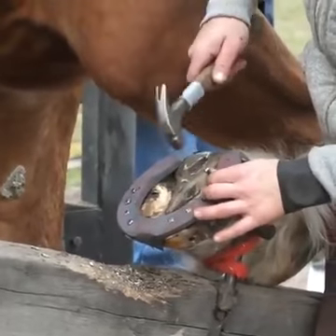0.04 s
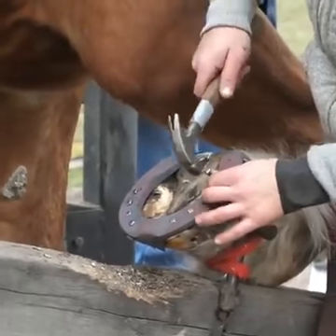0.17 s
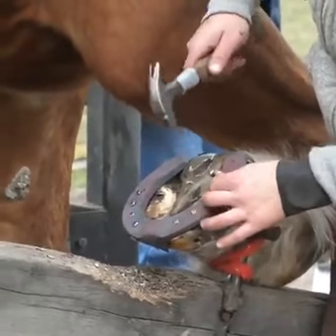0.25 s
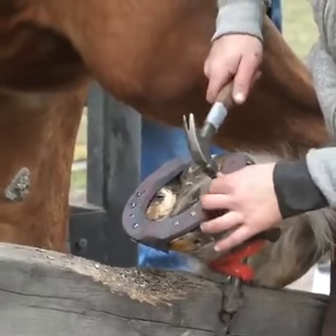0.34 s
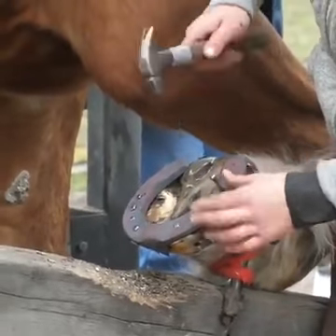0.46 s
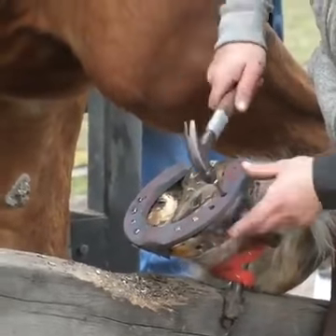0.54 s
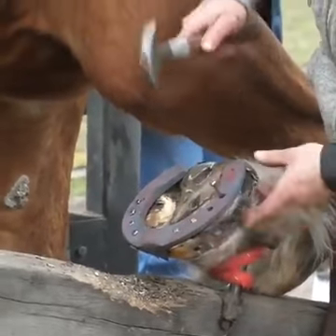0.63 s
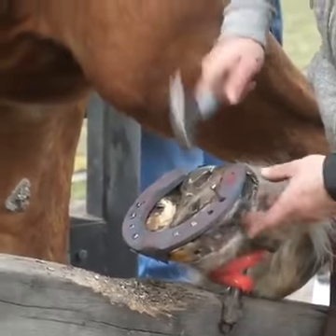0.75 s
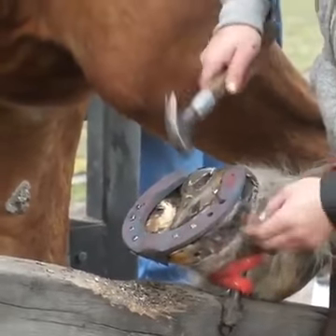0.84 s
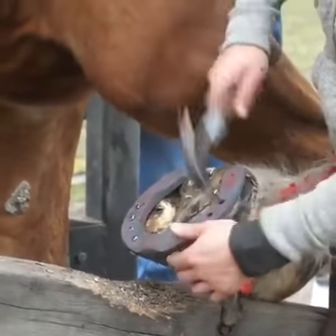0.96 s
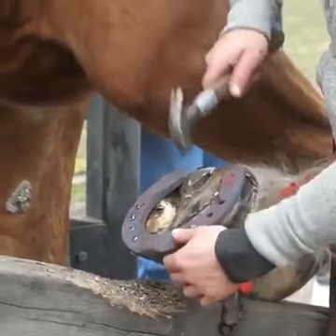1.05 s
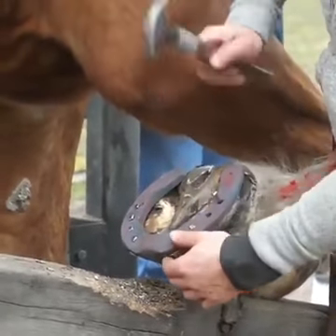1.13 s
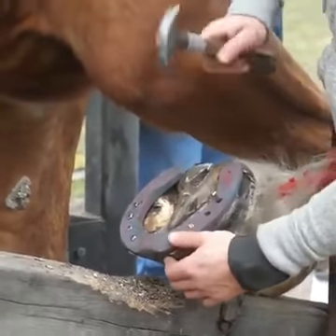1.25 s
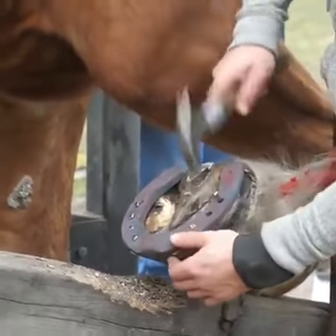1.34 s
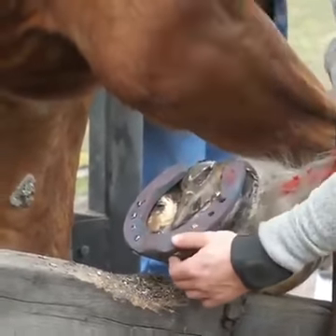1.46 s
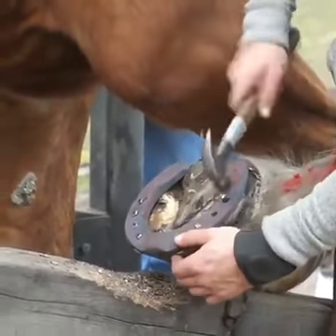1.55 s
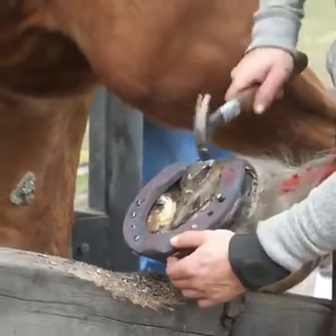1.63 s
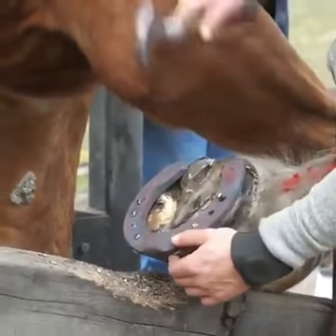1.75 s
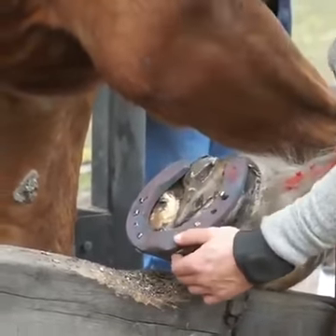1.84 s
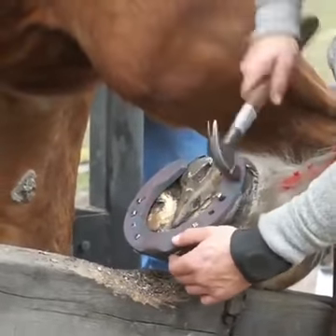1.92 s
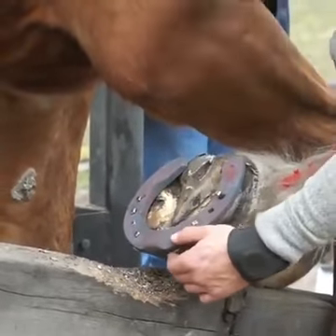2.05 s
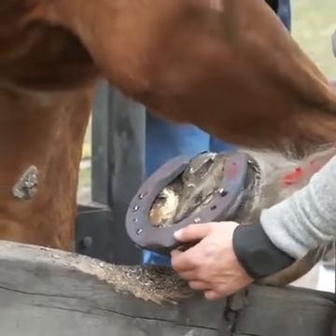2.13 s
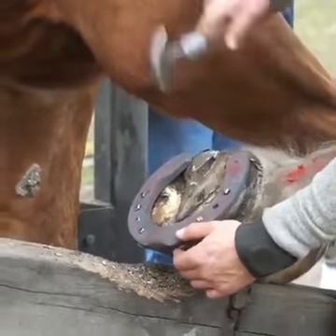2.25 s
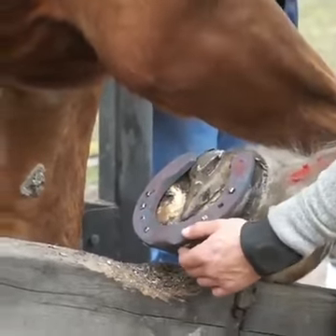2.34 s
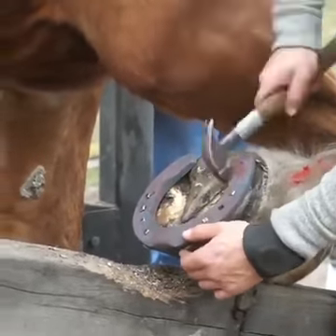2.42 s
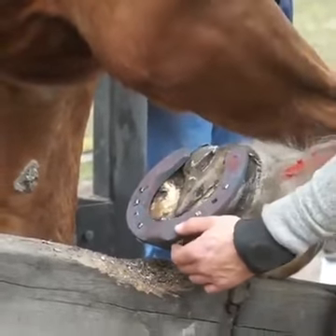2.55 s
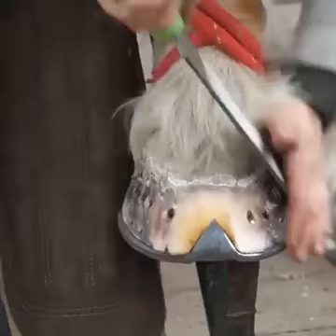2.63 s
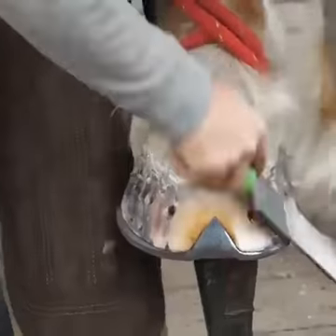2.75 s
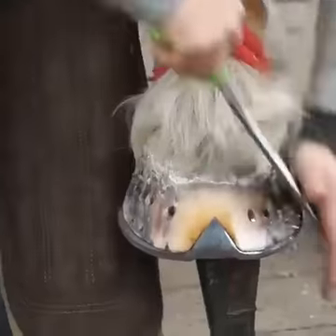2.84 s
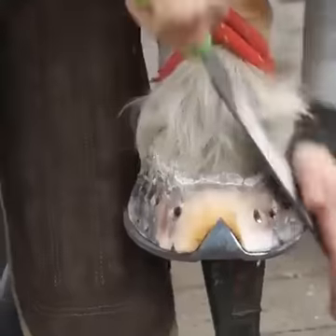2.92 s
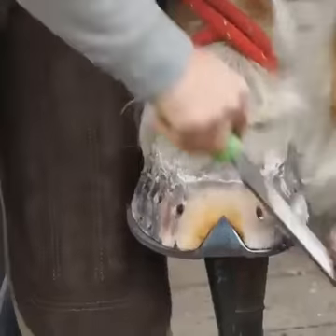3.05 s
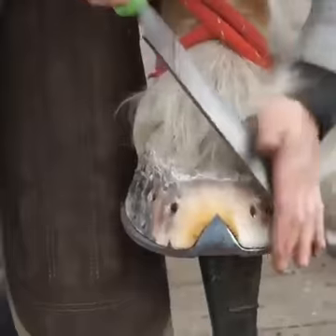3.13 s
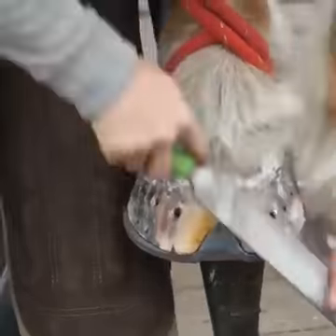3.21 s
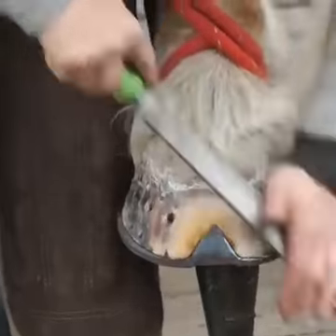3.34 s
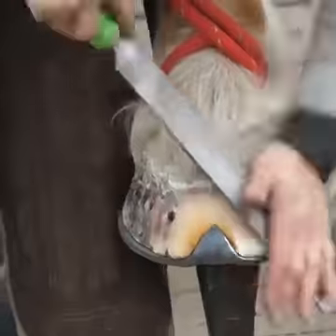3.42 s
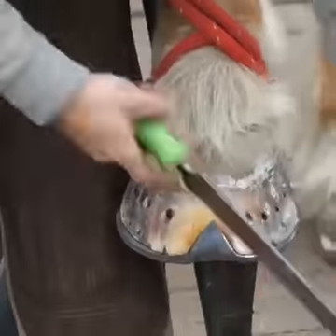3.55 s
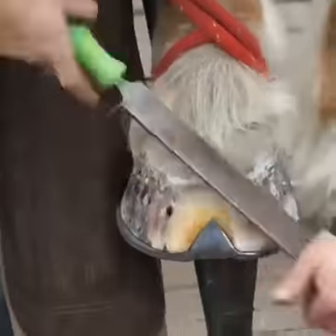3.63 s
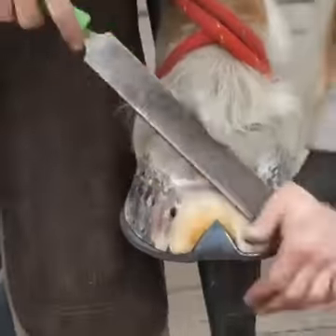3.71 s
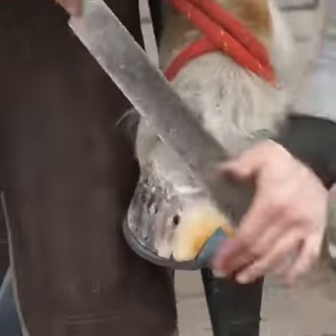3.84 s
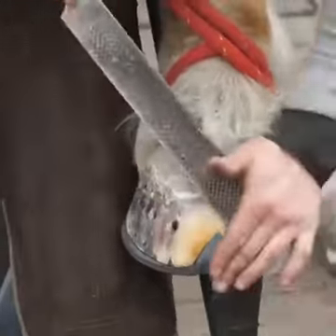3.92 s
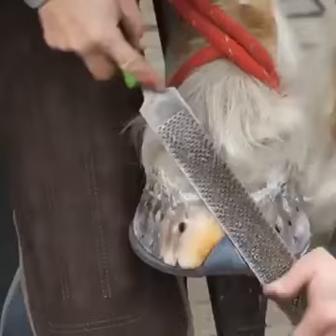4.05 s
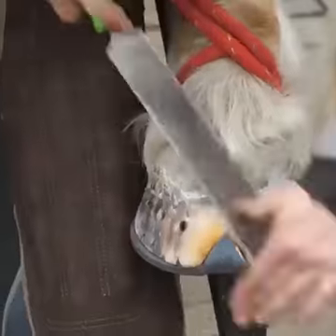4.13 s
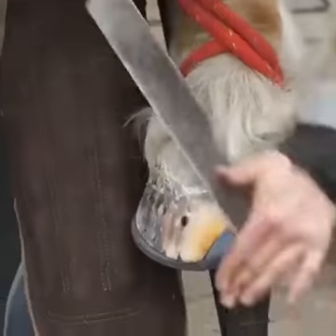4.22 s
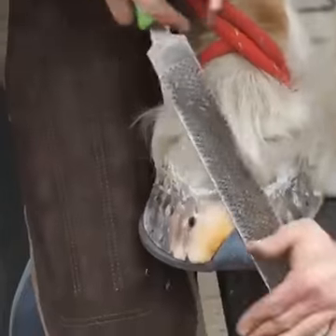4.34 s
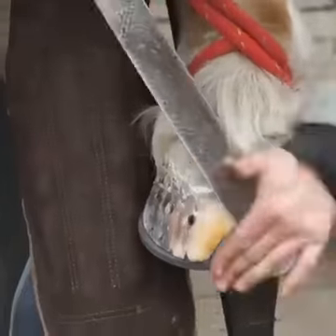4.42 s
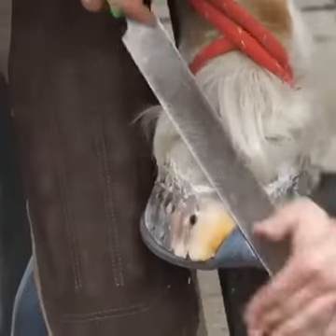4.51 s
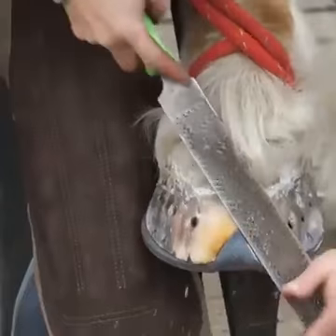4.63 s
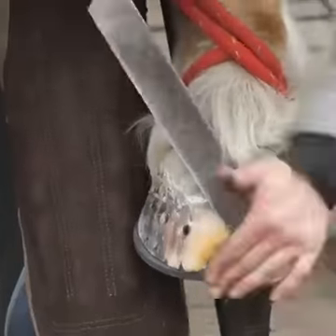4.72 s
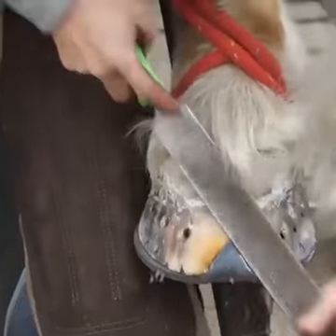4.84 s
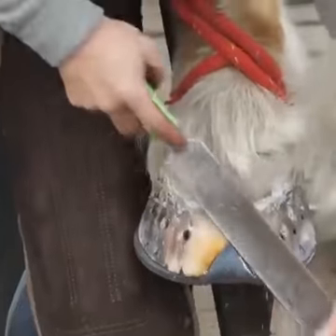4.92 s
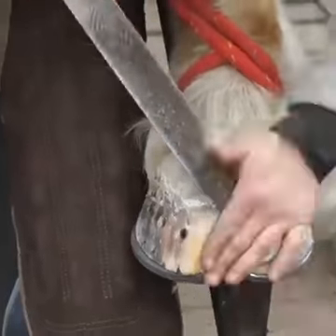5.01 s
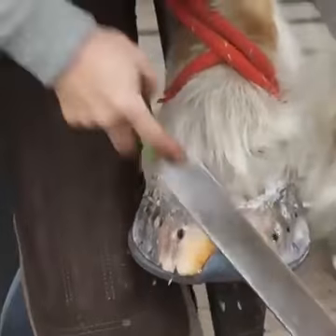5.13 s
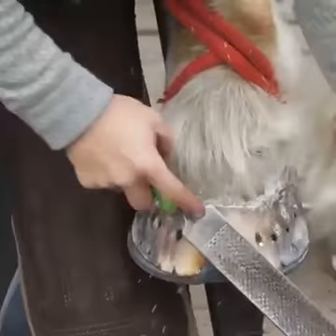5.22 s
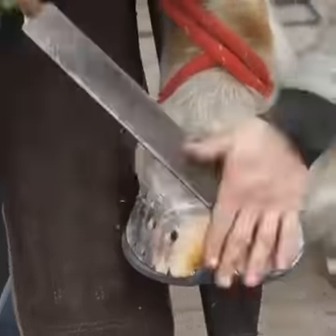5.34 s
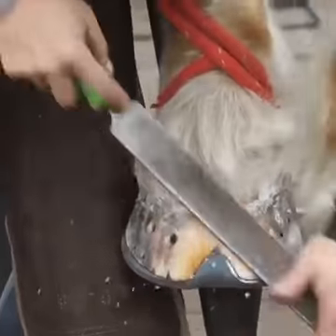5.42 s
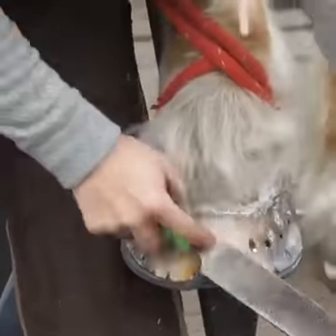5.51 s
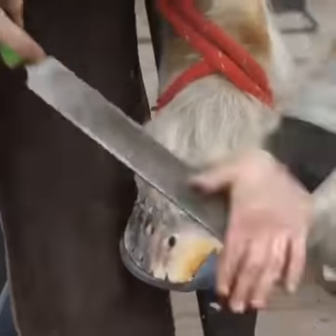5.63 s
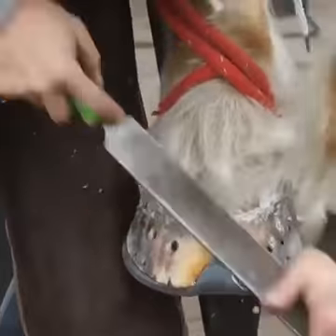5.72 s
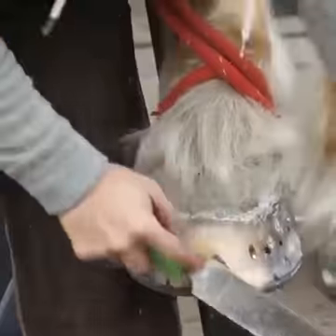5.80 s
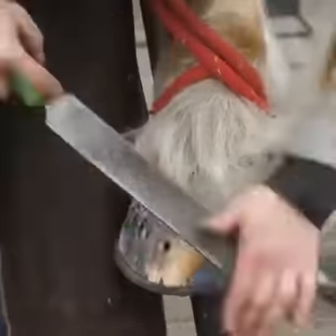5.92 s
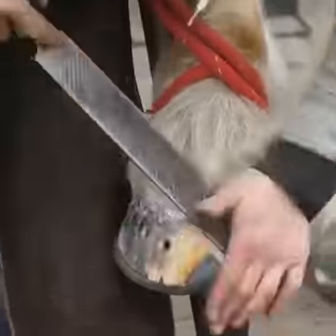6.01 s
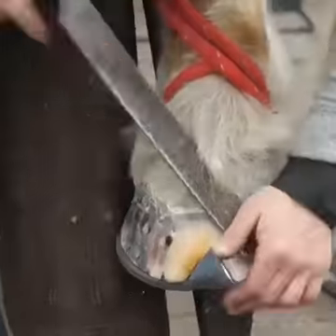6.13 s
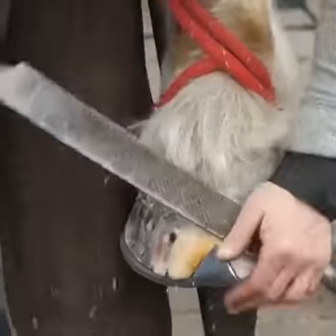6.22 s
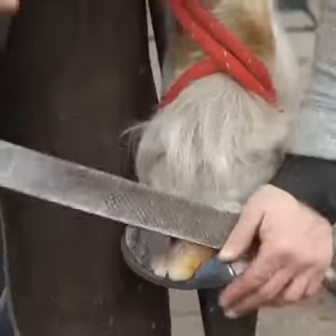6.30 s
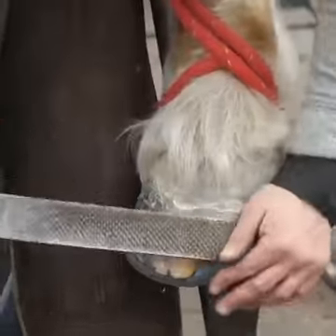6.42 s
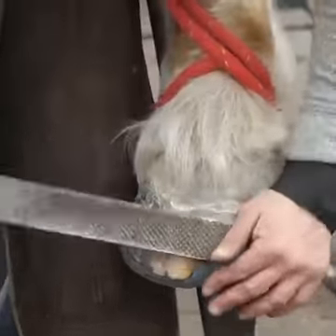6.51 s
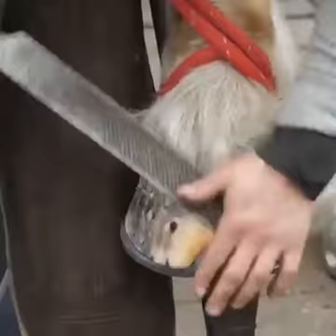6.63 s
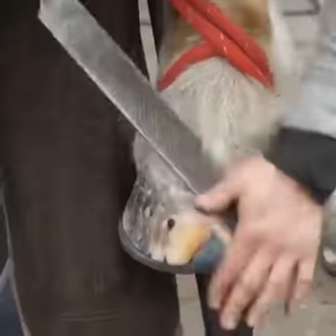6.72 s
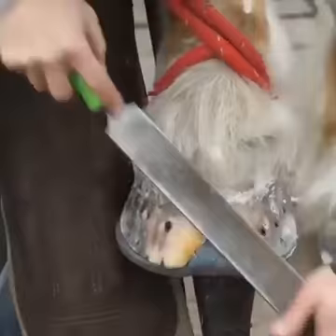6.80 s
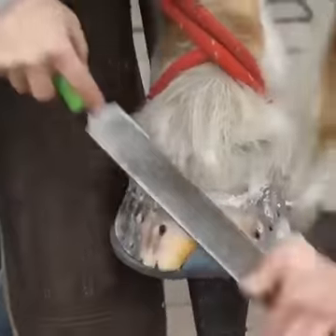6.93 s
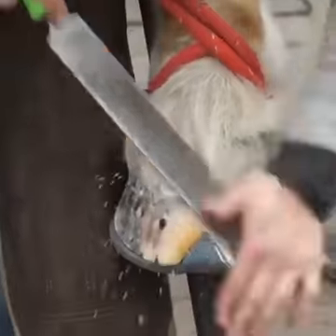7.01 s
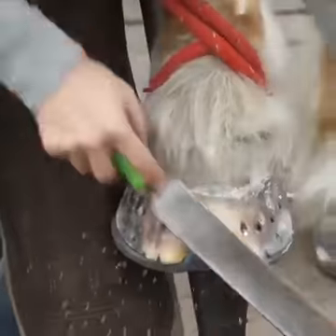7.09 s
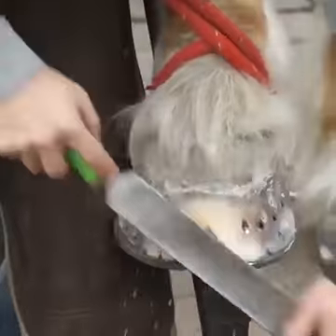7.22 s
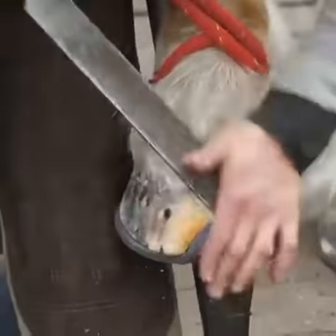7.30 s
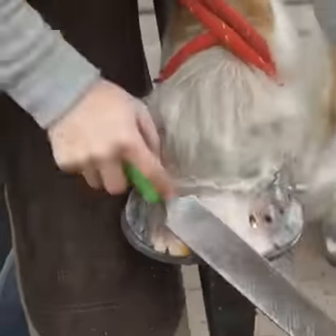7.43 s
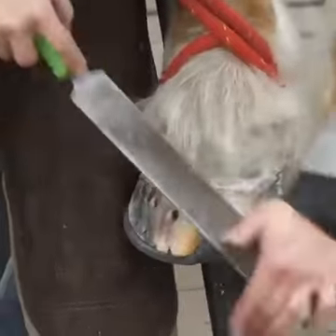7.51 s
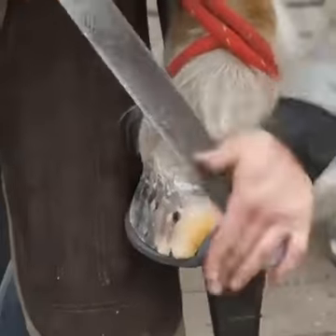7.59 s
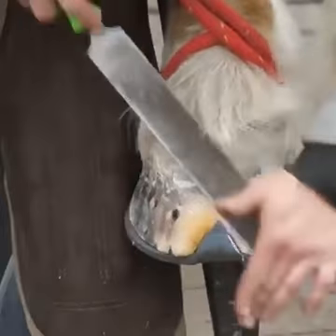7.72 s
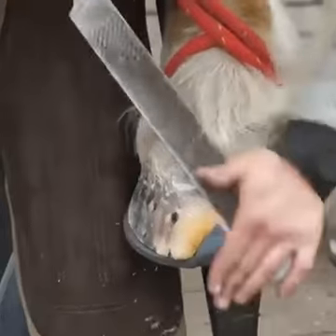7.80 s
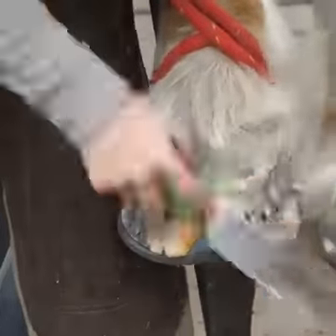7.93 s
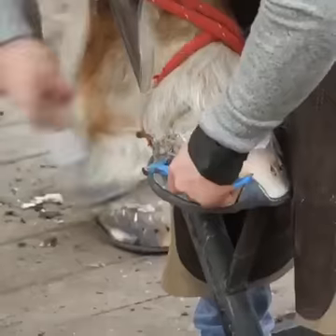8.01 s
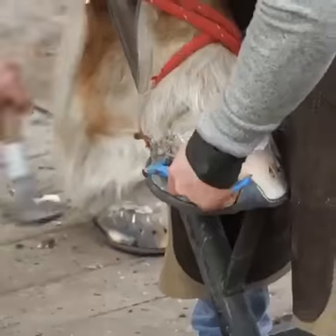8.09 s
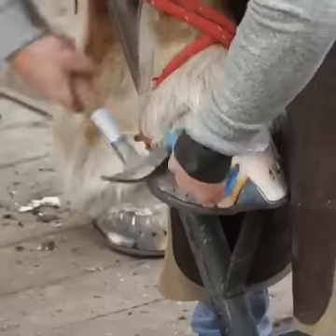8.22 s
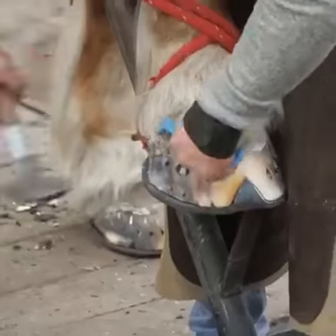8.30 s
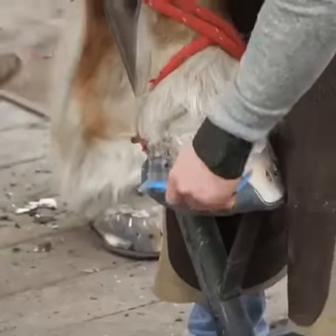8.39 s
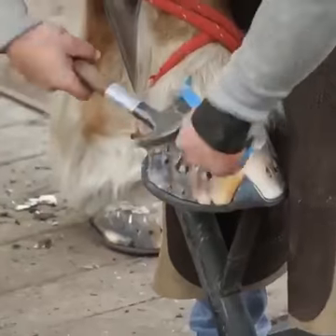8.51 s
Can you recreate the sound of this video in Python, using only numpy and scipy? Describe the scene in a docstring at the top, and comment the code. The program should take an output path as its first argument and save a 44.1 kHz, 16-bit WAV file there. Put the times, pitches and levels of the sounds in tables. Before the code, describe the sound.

In an open yard, a bird chirps faintly over a soft hiss and low hum while a hammer starts tapping horseshoe nails close to the microphone. The blows get louder and ring brightly. Then a rasp files the hoof wall in short, gritty strokes as the hoof stand knocks dully. The filing eases, picks up again with two quick falling zips, and the hammer returns with two sharp hits.

```python
"""A farrier works on a shod hoof in an open yard, over a low hum, a soft hiss and a little wind.
A bird chirps faintly as a light hammer starts tapping the nails: each blow cracks and thuds,
the steel head sings, and the shoe rings on after two hard hits. From about 3 s a rasp files the
hoof wall in quick strokes, its teeth tearing chips while the hoof stand rocks and knocks.
Late on the teeth zip twice and the shoe rings again; just after 8 s the hammer returns."""
import sys
import numpy as np
from scipy import signal
from scipy.fft import rfft, irfft, next_fast_len
from scipy.io import wavfile
from scipy.ndimage import uniform_filter1d

SR = 44100
rng = np.random.default_rng(int(sys.argv[2]) if len(sys.argv) > 2 else 0)


def dump_mix(stems):
    """Bounce the given channels to the path in sys.argv[1] as a 16-bit WAV at rate SR."""
    frames = np.atleast_2d(stems).T  # one column per channel
    limited = np.clip(frames, -1, 1)  # hard clip at full scale
    pcm = np.round(limited * 32767).astype(np.int16)
    wavfile.write(sys.argv[1], SR, pcm)


N = 377231

# hammer blows, with lighter scuffs and scrapes among them: t/s, crack/dB, thud/dB, brightest f/Hz, hardness/(dB
# per octave), rattle/dB, song of the head/dB, fade of the song/(dB per s)
BLOWS = [(0.034, -25.5, -53, 3480, 18, -44, -80, 200), (0.2269, -25, -45, 7850, 5, -44, -46, 230),
         (0.3678, -27.5, -61, 5060, 1.5, -45, -80, 200), (0.423, -24, -33, 9680, 2, -39.5, -45, 160),
         (0.59, -38, -53, 4000, -5, -55, -80, 200), (0.624, -23, -29.5, 4800, 5, -33, -40, 174),
         (0.845, -15, -29, 8800, -2, -36.5, -40.5, 139), (0.9086, -27, -52, 3050, -4.5, -41.5, -80, 200),
         (1.0311, -36, -46, 3060, -13, -54, -80, 200), (1.067, -12, -22.5, 9300, -2, -30.5, -37, 185),
         (1.1013, -41, -47, 3060, -2.5, -27, -80, 200), (1.2875, -8.5, -14.5, 7270, -0.5, -49, -34, 146),
         (1.48, -4, -11, 7500, 1, -50, -42, 95), (1.652, -3.5, -15, 7780, -1.5, -49, -39, 126),
         (1.822, -13.5, -52, 3900, 0, -17, -52, 60), (1.8667, -3.5, -25, 3030, -5, -22, -31.5, 121),
         (1.9956, -0.5, -18, 4950, 4.5, -62, -38, 96), (2.2063, -37, -39, 8050, -16, -52, -80, 200),
         (2.2191, -3, -26, 7600, 2.5, -47, -35.5, 83), (2.443, -36, -27, 3130, -6, -38, -80, 200),
         (2.4608, -18, -40, 3220, -6, -31, -80, 200), (2.4784, -12, -12, 4700, 0.5, -23, -38, 230),
         (2.723, -29, -29, 3240, -1, -21, -80, 200), (2.7348, -5.5, -11.5, 3280, 1, -71, -39, 124),
         (2.7717, -27, -47, 4000, 1.5, -19, -80, 200), (2.9616, -17, -29, 4990, 6, -50, -50, 150),
         (3.2125, -5, -42, 7160, -2, -50, -58, 200), (8.195, -40, -55, 7000, 3, -55, -43.5, 174),
         (8.323, -2, -42, 9500, 5, -54, -30, 111), (8.5297, -3, -39, 9700, 3.5, -27, -42, 90)]
# spectrum of the crack: f/Hz, level/dB
CRACK_SPECTRUM = [(180, 1), (300, -13), (559, 2.5), (1460, 3.5), (3510, -0.5), (5000, 0.5), (5530, -4),
                  (12600, -10.5), (14400, -12), (16000, -18), (16800, -43)]


def amp(db):
    """Gain of a level in dB."""
    return 10 ** (np.asarray(db) / 20)


def unit_rms(x):
    """Scales to rms 1."""
    return x / np.sqrt(np.mean(x ** 2) + 1e-20)


def wander(size, smooth):
    """Random drift of rms 1, averaged over `smooth` samples."""
    return unit_rms(uniform_filter1d(rng.standard_normal(size), smooth))


def add(mix, s, sound):
    """Mixes a sound in at time s."""
    part = mix[round(s * SR):][:len(sound)]
    part += sound[:len(part)]


def coloured(x, spectrum, tilt_db=0):
    """EQs x by (f/Hz, level/dB) points, tilted by tilt_db per octave around 4 kHz."""
    size = next_fast_len(len(x))
    hz = np.fft.rfftfreq(size, 1 / SR)
    point_hz, point_db = np.transpose(spectrum)
    db = np.interp(np.log(hz + 1), np.log(point_hz + 1), point_db)
    db += tilt_db * np.log2((hz + 50) / 4000)
    return irfft(rfft(x, size) * amp(db), size)[:len(x)]


def noise(size, spectrum, tilt_db=0):
    """Coloured noise of rms 1."""
    return unit_rms(coloured(rng.standard_normal(size), spectrum, tilt_db))


def ringing(x, modes):
    """Drives two-pole resonances (f/Hz, width/Hz, level/dB); the sum has rms 1."""
    out = np.zeros(len(x))
    for hz, width, db in modes:
        r = np.exp(-np.pi * width / SR)
        poles = [1, -2 * r * np.cos(2 * np.pi * hz / SR), r * r]
        out += amp(db) * (1 - r) * signal.lfilter([1, 0, -1], poles, x)
    return unit_rms(out)


def gliding(x, hz, width_hz):
    """A resonance that follows the curve hz: shift down, smooth, shift back; rms 1."""
    turn = np.exp(2j * np.pi * np.cumsum(hz) / SR)
    r = np.exp(-np.pi * width_hz / SR)
    return unit_rms((turn * signal.lfilter([1 - r], [1, -r], x / turn)).real)


def struck(modes, t, spread):
    """Dying sines (f/Hz, level/dB, t60/s); pitch and level vary by where the blow falls."""
    chance = rng.standard_normal((len(modes), 2))
    return sum(amp(db + 3.8 * louder - 60 * t / t60) * np.sin(2 * np.pi * hz * (1 + spread * detune) * t)
               for (hz, db, t60), (detune, louder) in zip(modes, chance))


def whistles(rows, waver, overtone_db):
    """Short gliding tones that swell and fade."""
    out = np.zeros(N)
    for s, length, first_hz, last_hz, db in rows:
        progress = np.arange(0, length, 1 / SR) / length
        hz = (first_hz + (last_hz - first_hz) * progress) * (1 + waver * wander(len(progress), 60))
        phase = 2 * np.pi * np.cumsum(hz) / SR
        tone = np.sin(phase) + amp(overtone_db) * np.sin(2 * phase)
        add(out, s, np.sqrt(2) * amp(db) * tone * np.sin(np.pi * progress))
    return out


def patchy(x, depth_db, bins, frames, scatter=0):
    """Raises and lowers random patches of pitch and time; scatter also shuffles the phases."""
    spectra = signal.stft(x, nperseg=512)[2]
    patches = uniform_filter1d(rng.standard_normal(spectra.shape), bins, axis=0)
    patches = unit_rms(uniform_filter1d(patches, frames, axis=1))
    turn = np.exp(2j * np.pi * scatter * rng.random(spectra.shape))
    gain = amp(depth_db * np.minimum(patches, 1.5)) * turn
    return signal.istft(spectra * gain / np.sqrt(np.mean(abs(gain) ** 2)), nperseg=512)[1][:N]


def yard():
    """The bed: a lumpy low hum, a soft hiss and a little wind on the microphone."""
    # level rides: t/s, hum/dB, hiss/dB, wind/dB
    rides = [(0.0, -59.5, -51, -83), (0.48, -47.5, -51.5, -78), (1.0, -51, -48.5, -82),
             (1.4, -51.5, -50, -81), (1.85, -50.5, -48.5, -69), (2.3, -49, -47, -80),
             (2.68, -50.5, -49.5, -79), (2.72, -51, -42.5, -72), (3.5, -54.5, -48.5, -73),
             (4.1, -55.5, -50.5, -87), (5.0, -52.5, -44.5, -81), (5.5, -57.5, -48, -75),
             (5.8, -58.5, -57.5, -83), (6.2, -54.5, -47, -70), (6.69, -62, -58, -82), (7.15, -58, -47, -75),
             (8.0, -55, -47.5, -80.5), (8.35, -50.5, -43, -72), (8.55, -50.5, -46, -86)]
    # colours of the three noises: f/Hz, level/dB
    hum_spectrum = [(65, -49), (110, -20), (160, -6.5), (209, -5.5), (296, 2.5), (426, -5), (551, -13.5),
                    (623, -7), (700, -22), (910, -68), (1540, -120)]
    wind_spectrum = [(15, -6), (30, 2.5), (60, 0), (110, 5), (160, -53)]
    hiss_spectrum = [(240, -23), (450, 1.5), (1200, 6), (2500, 1.5), (5000, -2.5), (8000, -7), (8500, -15),
                     (12000, -18), (15800, -24.5)]
    times, *levels = np.transpose(rides)
    hum_db, hiss_db, wind_db = [np.interp(np.arange(N) / SR, times, db) for db in levels]
    lumps_db, gusts_db = 1.5 * wander(N, 2500), 5.7 * wander(N, 2500)
    hum = noise(N, hum_spectrum) * amp(hum_db + lumps_db)
    wind = noise(N, wind_spectrum) * amp(wind_db + gusts_db)
    hiss = patchy(noise(N, hiss_spectrum), depth_db=3.6, bins=5, frames=10) * amp(hiss_db)
    return hum + wind + hiss


def bird():
    """Faint, clean chirps, each a short pitch glide."""
    # chirps: t/s, length/s, first f/Hz, last f/Hz, level/dB
    chirps = [(0.0, 0.081, 3360, 3480, -48), (0.16, 0.055, 3465, 3520, -56), (0.66, 0.064, 4760, 5270, -53),
              (0.752, 0.037, 4080, 3800, -45.5)]
    return whistles(chirps, waver=0.007, overtone_db=-40)


def knock(crack_db, thud_db, tilt_db, peak_hz, crack_t60):
    """Steel meets hoof: a crack of a few ms, brightest around one pitch, over the hoof's short ring."""
    # modes of the hoof: f/Hz, level/dB, t60/s
    hoof_modes = [(585, -3, 0.028), (995, -1.5, 0.024), (1499, -1, 0.021), (1940, -15, 0.01)]
    t = np.arange(4096) / SR
    white = rng.standard_normal(len(t))
    burst = unit_rms(coloured(white, CRACK_SPECTRUM, tilt_db))
    burst += 0.71 * ringing(white, [(peak_hz, 550, 0)])
    crack = burst * amp(-60 * t / crack_t60) * (1 - np.exp(-t / 0.0019))
    thud = struck(hoof_modes, t, spread=0.07) * (1 - np.exp(-t / 0.00039))
    return amp(crack_db - 3.5) * crack + amp(thud_db - 0.5) * thud


def hammer():
    """Each blow or scrape cracks, thuds and rattles nail and shoe."""
    rattle_t60 = 0.12
    high_cut = signal.butter(2, 10100, fs=SR, output="sos")
    low_cut = signal.butter(2, 433, "high", fs=SR, output="sos")
    out, t = np.zeros(N), np.arange(SR // 2) / SR
    for s, crack_db, thud_db, peak_hz, tilt_db, rattle_db, *_ in BLOWS:
        add(out, s - .0005, knock(crack_db, thud_db, tilt_db, peak_hz, crack_t60=0.016))
        rattle = signal.sosfilt(high_cut, noise(len(t), CRACK_SPECTRUM, tilt_db + 4))
        add(out, s, amp(rattle_db - 60 * t / rattle_t60) * rattle)
    return signal.sosfilt(low_cut, out)


def hammer_head():
    """The steel head sings three clear tones over a shimmer of close modes; higher tones die sooner."""
    # the clear tones: f/Hz
    tone_hz = [12187.5, 12937.5, 14062.5]
    # their envelopes: level over the song/dB, extra fade/(dB per s), opening flash/dB
    tone_shapes = [(5, 0, 0), (-9, 5, 17), (-9, 200, 19)]
    # dense upper modes: f/Hz, level/dB
    shimmer_spectrum = [(9500, -19), (10600, -6), (11000, -0.5), (11600, -1), (12000, -6), (14300, -39),
                        (14800, -22), (15700, -7), (16200, -21)]
    flash_s, dip_s, dip_above_db = .015, .035, -12
    t = np.arange(N) / SR
    db, age = np.full(N, -120.), np.zeros(N)  # level and age of the loudest blow's song
    for s, crack_db, *_, song_db, fade_db in BLOWS:
        span = slice(round(s * SR), round(s * SR) + SR // 2)
        since = t[span] - s
        # after a hard crack the song dips and swells back
        dip_db = 1.1 * max(crack_db - dip_above_db, 0) * np.exp(-since / dip_s)
        new_db = song_db - dip_db - fade_db * since
        age[span] = np.where(new_db > db[span], since, age[span])
        db[span] = np.maximum(db[span], new_db)
    db += 1.5 * unit_rms(uniform_filter1d(wander(N, 600), 600))  # wavers as the head turns
    tones = sum(amp(over_db - fall * age + flash_db * np.exp(-age / flash_s)) * np.sin(2 * np.pi * hz * t)
                for hz, (over_db, fall, flash_db) in zip(tone_hz, tone_shapes))
    shimmer = amp(0.95 * db - 4) * noise(N, shimmer_spectrum)  # fades more slowly
    return amp(db) * np.sqrt(2) * tones + shimmer


def horseshoe():
    """The iron rings on at two fuzzy pitches after the hardest blows and strokes."""
    # low and high ring: f/Hz
    ring_hz = [2290, 5120]
    # rings: t/s, length/s, low ring/dB, high ring/dB, width/Hz
    rings = [(2.019, .17, -72, -53, 260), (2.243, 0.18, -57, -45, 300), (7.726, 0.11, -43, -46, 30)]
    out = np.zeros(N)
    for s, length, *levels, width in rings:
        size = round(length * SR)
        for hz, db in zip(ring_hz, levels):
            ring = ringing(rng.standard_normal(size), [(hz, width, 0)])
            add(out, s, amp(db) * ring * signal.windows.tukey(size, .45))
    return out


def rasp_envelopes(strokes):
    """Gains of bite, boom, fizz and blade ring: each stroke rises, pushes and lifts; the loudest wins."""
    graze_db = (-65.5, -57, -78, -56)  # floors while the rasp only grazes the wall
    grow_db = (-0.5, 5.5, 3.5, 0)  # extra change over the push
    release_db_per_s = (520, 256, 523, 394)
    t = np.arange(0, N / SR, .001)
    db = np.outer(graze_db, np.ones(len(t)))
    for s, rise, push, bite_db, change_db, *over_db in strokes[:, :8]:
        held_db = bite_db + np.interp(t - s, [-rise, rise, rise + push], [-36, 0, change_db], left=-200)
        progress = np.clip((t - s - rise) / push, 0, 1)
        lifted_s = np.maximum(t - s - rise - push, 0)
        layer_db = held_db + np.array([0, *over_db])[:, None] + np.outer(grow_db, progress - .5)
        db = np.maximum(db, layer_db - np.outer(release_db_per_s, lifted_s))
    return [np.interp(np.arange(N) / SR, t, gain) for gain in amp(db)]


def rasp():
    """Teeth tear chips at random; the jolts ring the blade, the wall and the hoof stand."""
    # strokes and skids: t/s, rise/s, push/s, bite/dB, change over the push/dB,
    # boom/dB, fizz/dB, blade ring/dB (these three over the bite), low ring f/Hz, squeal f/Hz
    strokes = [(2.918, 0.0071, 0.045, -42.5, -8, 6, 2, 2, 1440, 4230),
               (2.95, 0.012, 0.088, -27.5, -7, -11.5, 0, -5.5, 1474, 6400),
               (3.157, 0.0058, .004, -42.5, -1, -4, -3, -12, 1470, 4200),
               (3.201, 0.02, 0.071, -25, -12.5, -7.5, -2.5, -2, 1410, 5640),
               (3.402, 0.0031, 0.026, -36.5, -21, -9, 19, -20, 1410, 7950),
               (3.451, 0.026, 0.056, -26, -14, -2.5, -3, 6, 1360, 6200),
               (3.672, .005, 0.024, -47.5, -2, 2, 5, 4, 1320, 5650),
               (3.704, 0.014, 0.071, -30.5, -4, 0.5, -3, 2.5, 1120, 5200),
               (3.975, .033, .004, -36.5, -4.5, -12, -3, 3.5, 1260, 6800),
               (4.11, 0.023, 0.034, -59, -4, 12.5, 3, 7, 1340, 4340),
               (4.216, 0.075, 0.056, -46, -4, 5.5, -1, 0, 1230, 4230),
               (4.4, 0.034, 0.048, -45, -2, -7, -3.5, -7, 1330, 5140),
               (4.5, 0.021, 0.057, -50, 5.5, 0, -6, 2, 1400, 4350),
               (4.68, 0.04, 0.034, -50, -6, -1, -1, 2, 1360, 3780),
               (4.779, 0.03, 0.074, -44, -1.5, 2.5, -1, 3, 1240, 4200),
               (4.93, 0.047, 0.041, -47, 0.5, -10, -1.5, -3, 1420, 3560),
               (5.046, 0.03, 0.089, -43, 5.5, 4, -1.5, 4, 1400, 4030),
               (5.21, 0.052, 0.15, -42, -14.5, 2.5, 0, -22, 1210, 3800),
               (5.417, 0.015, 0.08, -32.5, -13.5, -1.5, -3.5, 8.5, 1530, 3600),
               (5.528, 0.039, 0.075, -37.5, -8, -1, 2.5, -6, 1090, 5550),
               (5.66, 0.039, 0.1, -38.5, -3, -5, -2.5, 0, 1280, 5030),
               (5.934, 0.0064, 0.0038, -31.5, 0.5, -8.5, -6.5, -31, 1060, 4900),
               (5.99, .015, 0.055, -44, 3, -7.5, -2, 0, 1300, 4900),
               (6.05, 0.039, 0.0022, -28.5, -0.5, -7, -11, 4.5, 1470, 4500),
               (6.238, 0.0047, .003, -30.5, -0.5, -5.5, -10, -5, 1080, 4830),
               (6.28, 0.064, 0.093, -41.5, -14, 2, -3, 2.5, 1170, 4940),
               (6.462, 0.01, .003, -41.5, -2, -4, -6, 7.5, 1030, 4230),
               (6.752, 0.0074, .003, -50.5, -4, 1, -4, -6, 1350, 6000),
               (6.85, 0.045, 0.054, -58, -6, 2, -3, 9, 1390, 5260),
               (7.04, 0.007, 0.055, -38.5, -8, -3.5, -5, -1, 1470, 4400),
               (7.088, 0.038, 0.048, -36.5, -10.5, 0.5, -3, 7.5, 1430, 5270),
               (7.185, .01, 0.033, -32.5, 2.5, -11.5, -3.5, -2.5, 1330, 5100),
               (7.328, 0.0064, 0.039, -32.5, -2, -9.5, -8, -10, 1480, 4800),
               (7.371, 0.014, 0.044, -33, 10.5, -22, -12.5, 2, 1130, 4530),
               (7.572, 0.0017, .002, -34, -2, -35, -8, -15, 1320, 6530),
               (7.609, 0.017, 0.037, -27.5, -7.5, -20, -8, 1, 1310, 4950),
               (7.66, 0.0091, 0.027, -25.5, 2.5, -16, -12, -0.5, 1390, 4200),
               (7.838, 0.004, .004, -34, -2, -27, -23, -30, 1480, 4650),
               (7.88, 0.02, 0.2, -45, -17, -2.5, 0.5, 2.5, 1080, 4620),
               (8.101, 0.022, 0.092, -40, 5.5, -8.5, -1.5, 4.5, 1165, 4860)]
    # rasp noise as heard, a bright band stepping down near 8 kHz with fainter fizz above: f/Hz, level/dB
    bright_band = [(880, -30), (1500, 3), (2210, -3), (2450, -4), (3590, 9), (4030, 2), (4620, 8.5),
                   (6430, 3.5), (7870, 5.5), (8400, -24), (10900, -50), (18500, -120)]
    fizz_band = [(7500, -52), (8300, 3.5), (9500, 0.5), (11000, 1), (13000, -2), (15700, -12), (17000, 5.5)]
    # boom of the stand, low bending and high modes of the blade: f/Hz, width/Hz, level/dB
    stand_modes = [(343, 60, -2.5), (457, 42, 17.5), (511, 160, 11), (590, 57, 6)]
    bending_modes = [(780, 250, 12), (1023, 115, 15), (1470, 540, 7), (1440, 70, 10), (1900, 180, -31.5)]
    steel_modes = [(2204, 110, 11), (3200, 110, -2), (4240, 110, 21), (5084, 51, -15), (4720, 33, -31.5),
                   (7000, 84, 3), (7900, 23, 2.5), (7730, 22, 28)]
    chips_per_s = 14000
    t, strokes = np.arange(N) / SR, np.array(strokes)
    filing = (t > 2.9) & (t < 8.31)
    chatter = amp(1.4 * wander(N, 160))  # uneven grip, a few ms long
    chips = (rng.random(N) < chips_per_s / SR) * rng.standard_normal(N)
    chips *= amp(1.4 * np.minimum(rng.exponential(1, N), 4))
    jolts = unit_rms(chips * chatter) * filing
    # the point of contact slides along the blade and favours one low and one high region of modes
    push_starts = strokes[:, 0] + strokes[:, 1]
    blade_hz, squeal_hz = [np.interp(t, push_starts, hz) for hz in strokes[:, 8:].T]
    squeal = gliding(jolts, squeal_hz, width_hz=120)
    bite = unit_rms(coloured(jolts, bright_band)) + 0.23 * ringing(jolts, steel_modes) + 0.21 * squeal
    boom = ringing(jolts, stand_modes)
    fizz = unit_rms(coloured(jolts, fizz_band))
    blade = 0.44 * ringing(jolts, bending_modes) + 0.27 * gliding(jolts, blade_hz, width_hz=54)
    # grip and angle keep shifting which modes speak
    layers = [patchy(x, depth_db=3, bins=4, frames=7) for x in (bite, boom, fizz, blade)]
    return filing * sum(gain * layer for gain, layer in zip(rasp_envelopes(strokes), layers))


def rasp_landings():
    """The rasp ticks as it lands on the wall or catches a nail."""
    # contacts: t/s, tick/dB, thud/dB, brightest f/Hz, hardness/(dB per octave)
    landings = [(2.9228, -19.5, -28, 3460, -5.5), (3.09, -27, -39, 4030, 5),
                (3.1632, -25, -30.5, 3920, -14), (3.4057, -20, -32, 8200, 0),
                (3.678, -19.5, -22, 6900, -10), (3.9793, -26.5, -26, 3110, 1),
                (4.0042, -15.5, -32, 7000, -3.5), (5.9369, -16.5, -27, 4240, -1.5),
                (6.242, -14.5, -21, 4160, -6), (6.2832, -22, -21.5, 4440, -30), (6.337, -27, -47, 7160, 3),
                (6.467, -36, -36, 4270, -18), (6.488, -27, -32, 4200, -3), (6.574, -30, -31.5, 4800, -9),
                (6.76, -28.5, -39, 6960, -0.5), (7.0478, -17, -50, 3520, 2.5),
                (7.3352, -14.5, -25.5, 3720, 2.5), (7.573, -12.5, -46, 7100, 2),
                (7.6205, -13, -21, 4790, -3), (7.671, -10, -37, 4200, 0), (7.839, -8, -55, 4960, 4.5),
                (7.904, -21.5, -35, 3600, -2.5), (7.945, -19, -32, 5130, -3.5)]
    out = np.zeros(N)
    for s, tick_db, thud_db, peak_hz, tilt_db in landings:
        add(out, s - .0005, knock(tick_db, thud_db, tilt_db, peak_hz, crack_t60=0.021))
    return out


def hoof_stand():
    """The stand rocks: dull pitched knocks with a soft attack."""
    # knocks: t/s, level/dB, f/Hz
    rocks = [(3.265, -31.5, 419), (3.334, -34, 475), (3.465, -21, 486), (3.54, -34, 328), (3.78, -21, 291),
             (3.79, -22, 411), (5.16, -20, 452), (5.233, -24.5, 507), (5.3, -26, 530), (5.45, -21.5, 463),
             (5.483, -22, 532), (5.56, -33, 460), (5.795, -34, 462)]
    attack_s, t60 = 0.0037, 0.1
    out, t = np.zeros(N), np.arange(8000) / SR
    for s, db, hz in rocks:
        add(out, s, struck([(hz, db, t60)], t, spread=0.0086) * (1 - np.exp(-t / attack_s)))
    return out


def rasp_zips():
    """Teeth catch in step and slow down, making a falling zip."""
    # zips: t/s, length/s, first tooth rate/Hz, last tooth rate/Hz, level/dB
    zips = [(7.4, .052, 1191, 799, -22), (7.662, 0.046, 1420, 847, -24.5)]
    return whistles(zips, waver=0.035, overtone_db=-12)


def scene():
    """All sources sit in the centre, the tools with a short reverb; a little width comes and goes."""
    # stereo width: f/Hz, side relative to mid/dB
    side_spectrum = [(60, -12), (110, -23), (200, -22), (380, -32), (700, -20), (1290, -19), (2380, -6),
                     (4400, -17), (8120, -1.5), (15000, -14.5)]
    reverb_db, reverb_t60 = -12, 0.14
    low_cut = signal.butter(4, 260, "high", fs=SR, output="sos")  # small bodies send out little bass
    tools = signal.sosfilt(low_cut, hammer() + rasp() + rasp_landings() + rasp_zips() + hoof_stand())
    t = np.arange(6000) / SR
    tail = rng.standard_normal(len(t)) * amp(-60 * t / reverb_t60)
    reverb = amp(reverb_db) * signal.oaconvolve(tools, tail / np.linalg.norm(tail))[:N]
    mid = tools + reverb + hammer_head() + horseshoe() + yard() + bird()
    side = coloured(patchy(mid, depth_db=12, bins=8, frames=8, scatter=1), side_spectrum)
    return np.array([mid + side, mid - side])


def record(dry):
    """The treble drops steeply above 15.6 kHz and ends near 17 kHz."""
    # treble roll-off: f/Hz, level/dB
    treble_rolloff = [(15600, 0), (15900, -28)]
    edge_hz = 16990
    heard = np.array([coloured(x, treble_rolloff) for x in dry])
    low_pass = signal.firwin(511, edge_hz, window=("kaiser", 9), fs=SR)
    return signal.oaconvolve(heard, low_pass[None], "same")


dry = scene()
out = record(dry)
dump_mix(out)
```